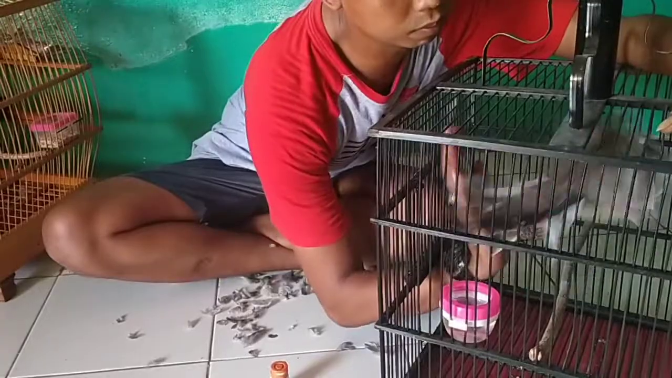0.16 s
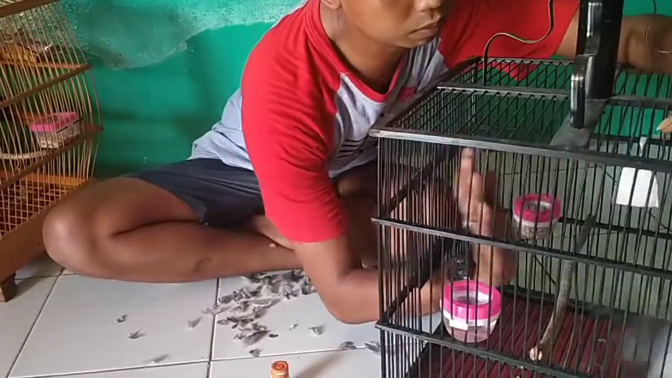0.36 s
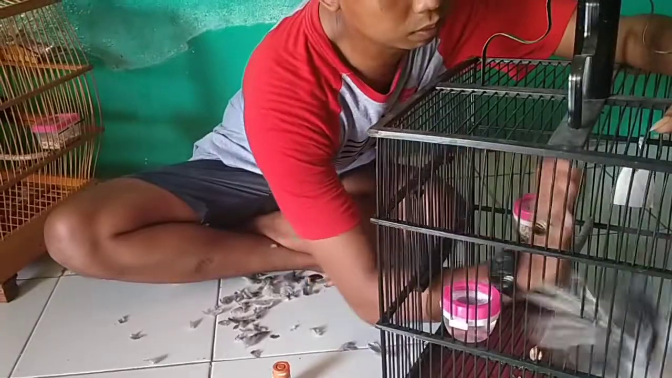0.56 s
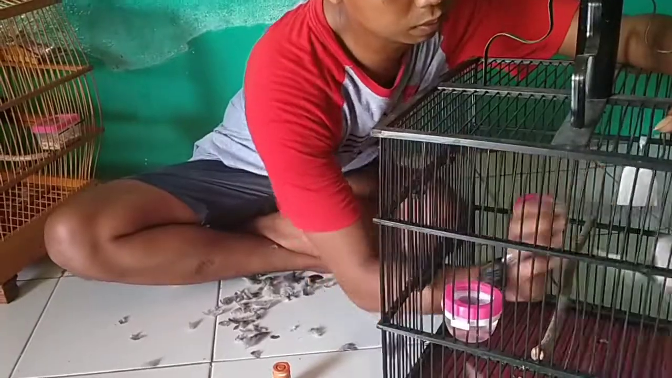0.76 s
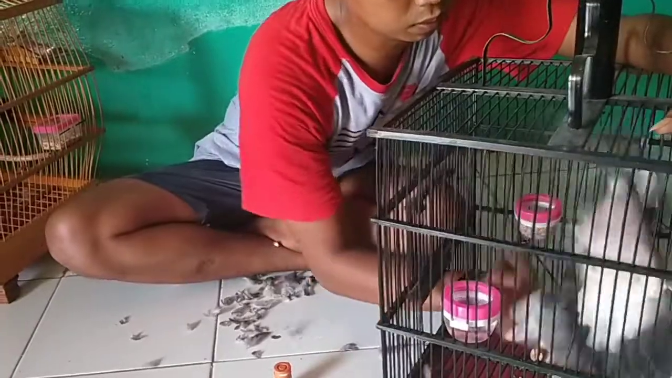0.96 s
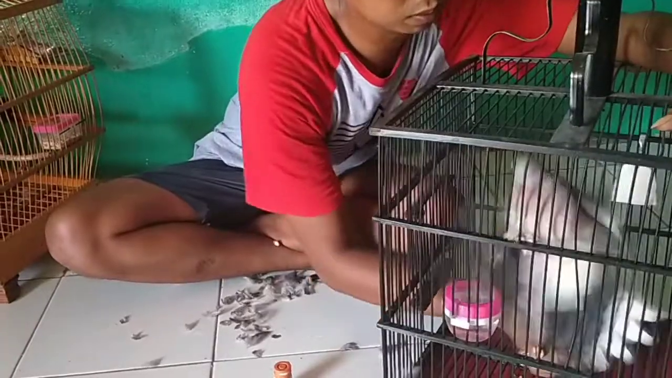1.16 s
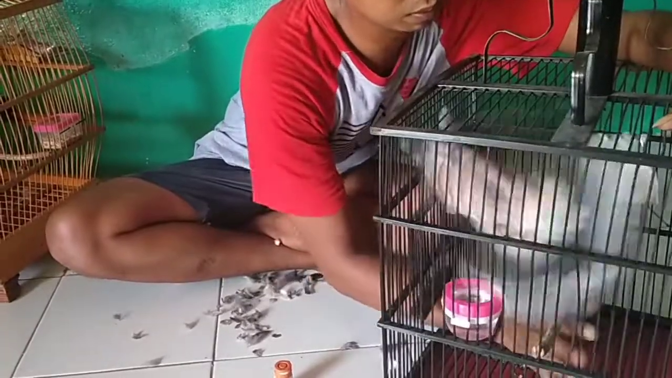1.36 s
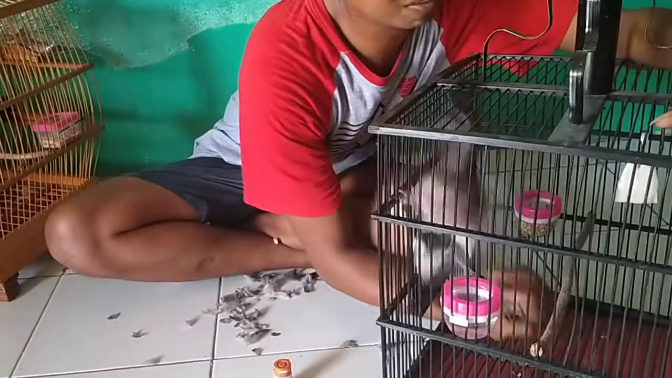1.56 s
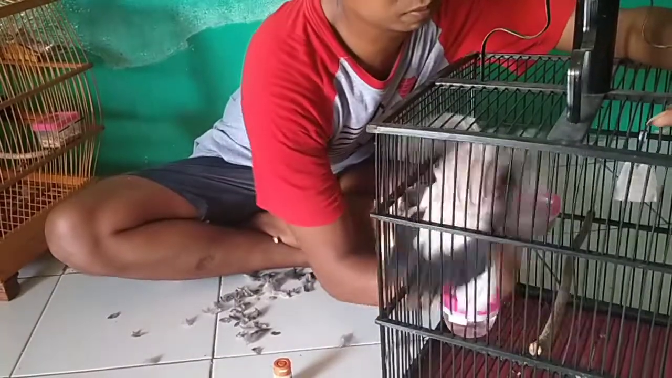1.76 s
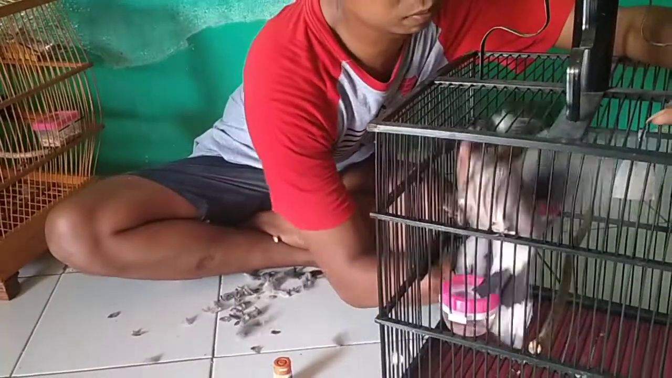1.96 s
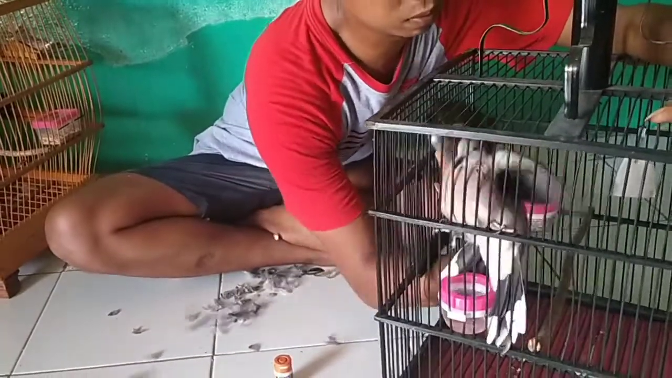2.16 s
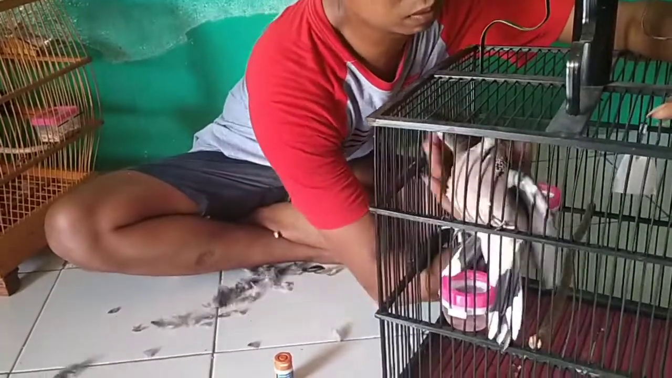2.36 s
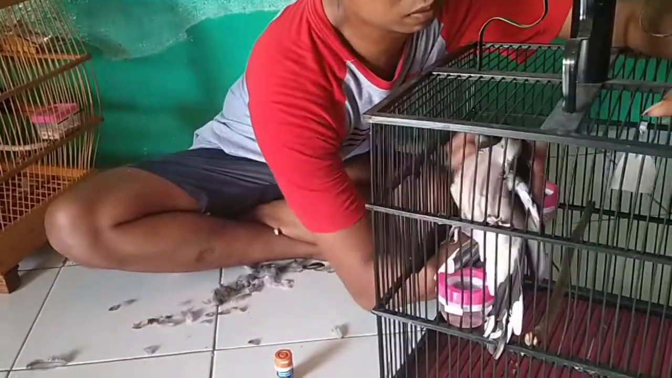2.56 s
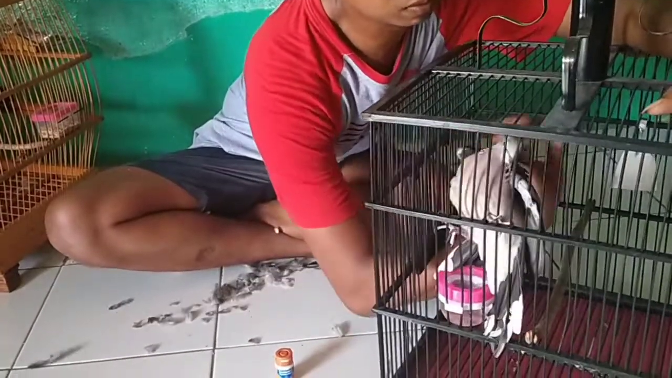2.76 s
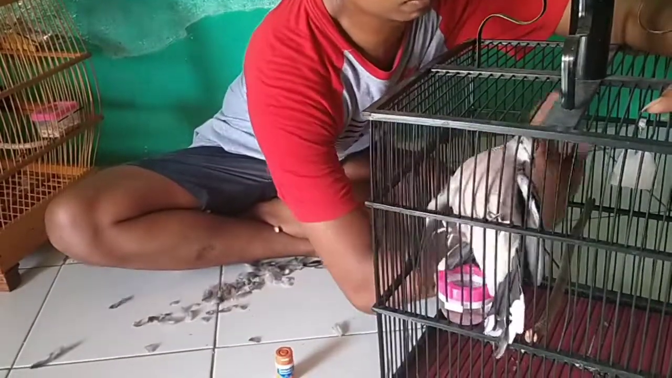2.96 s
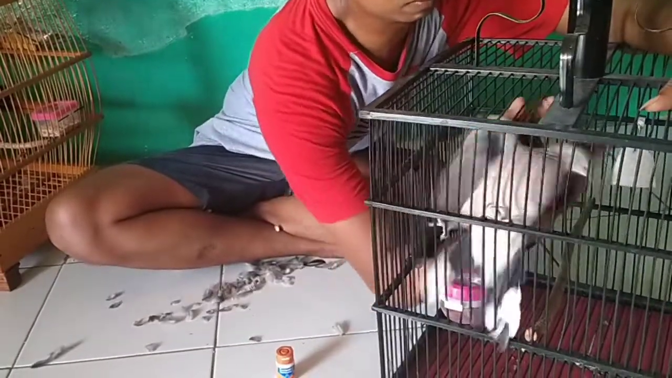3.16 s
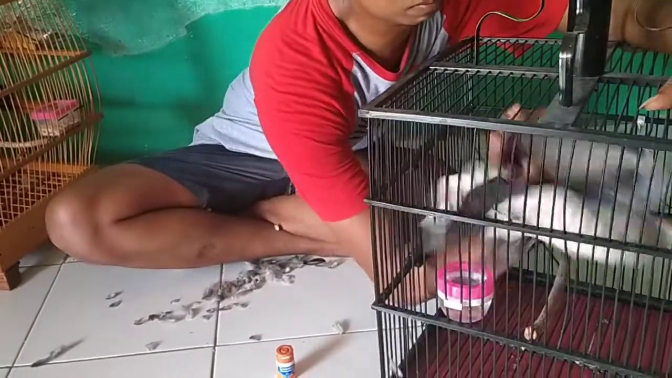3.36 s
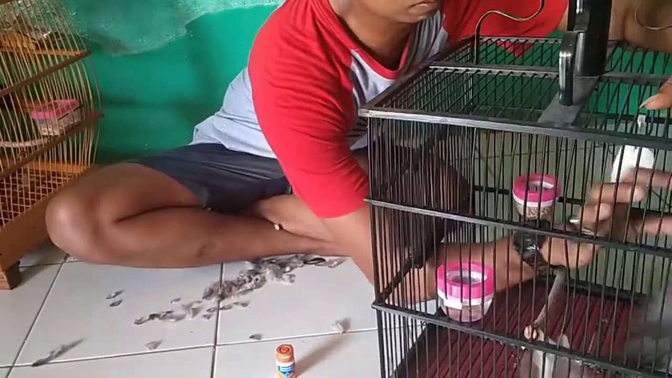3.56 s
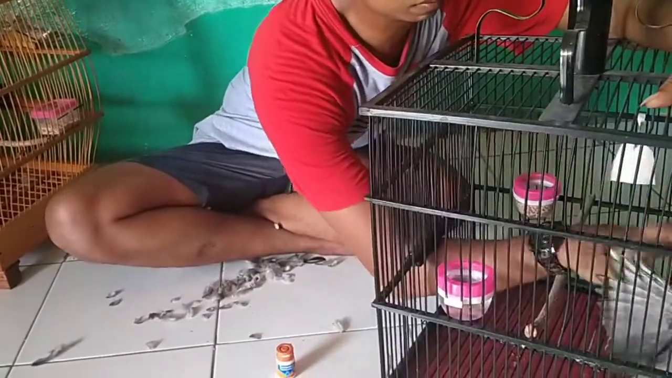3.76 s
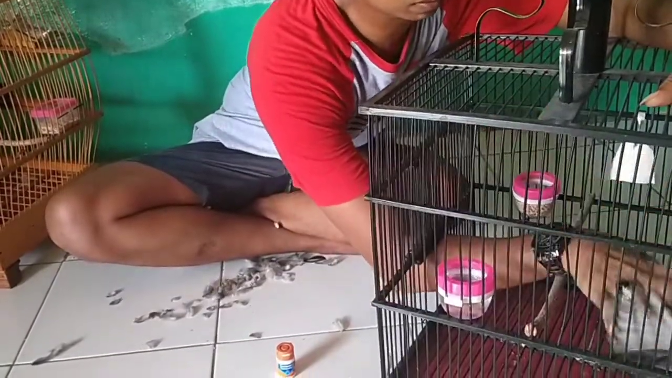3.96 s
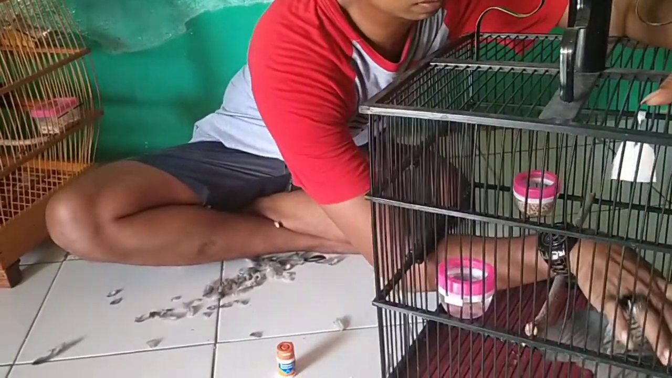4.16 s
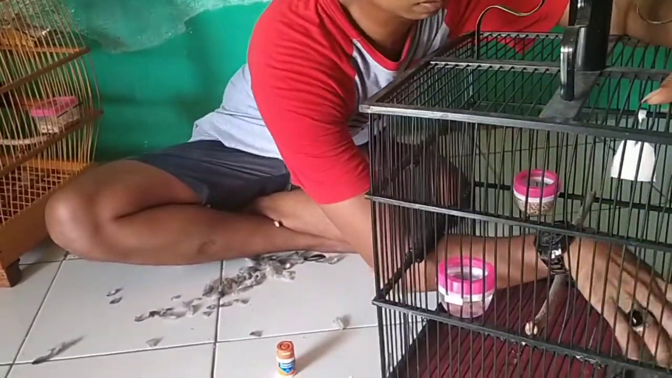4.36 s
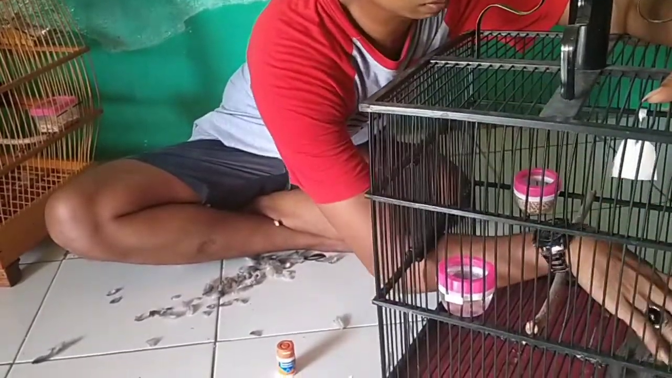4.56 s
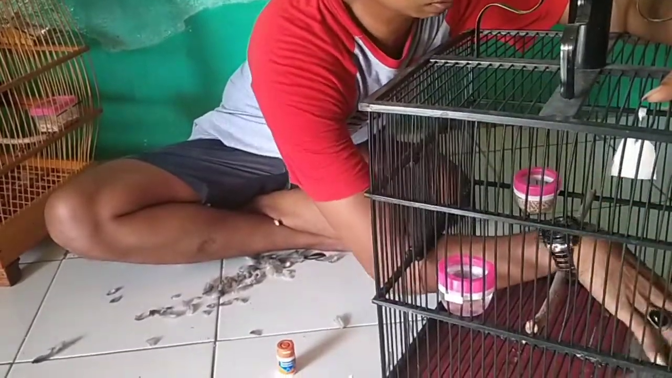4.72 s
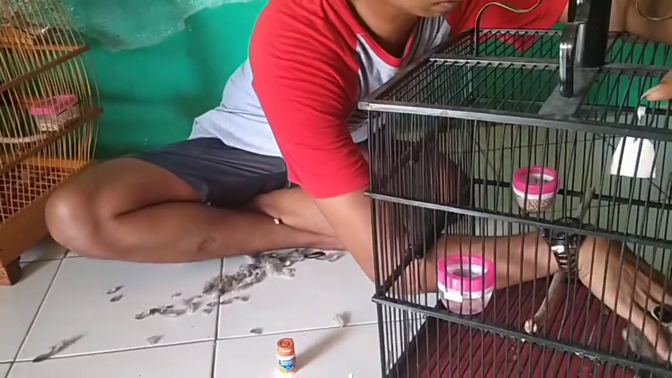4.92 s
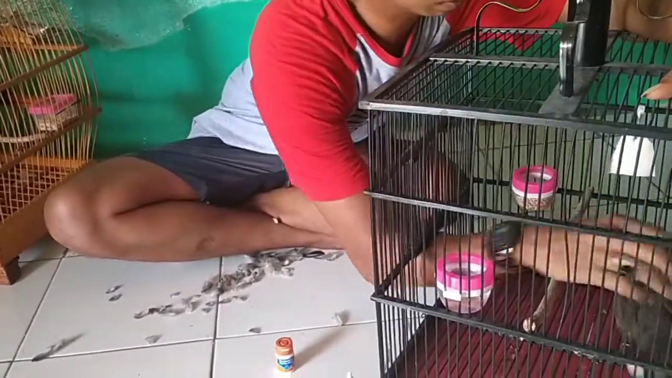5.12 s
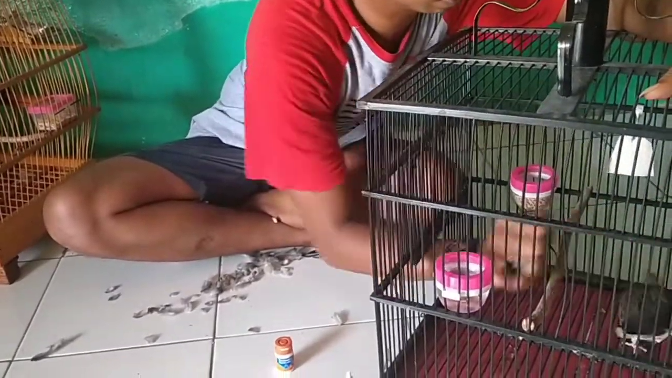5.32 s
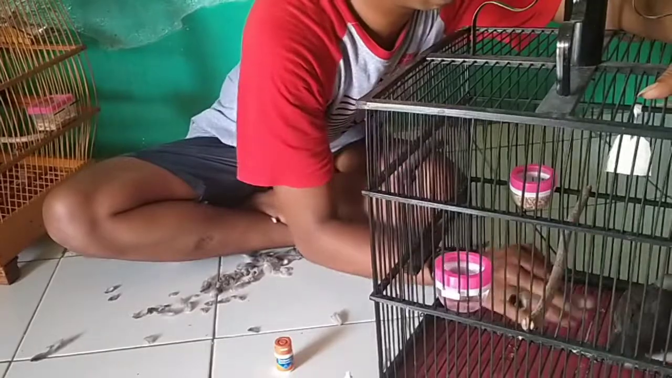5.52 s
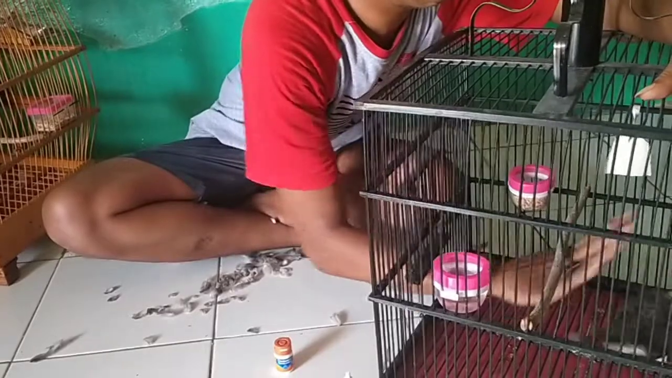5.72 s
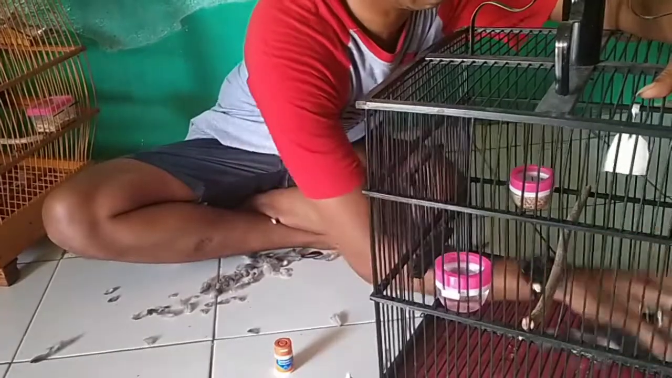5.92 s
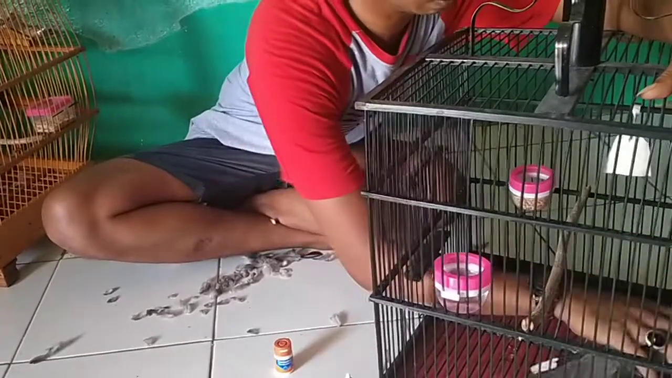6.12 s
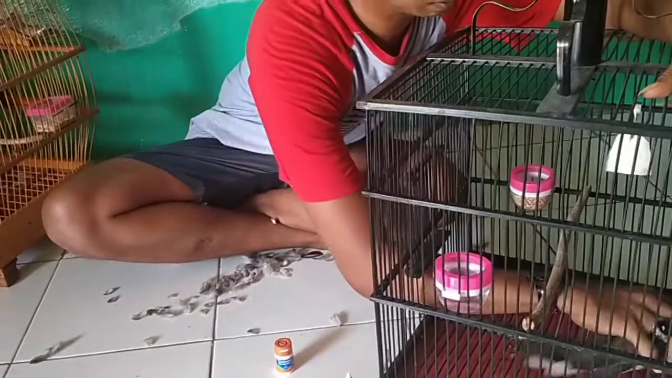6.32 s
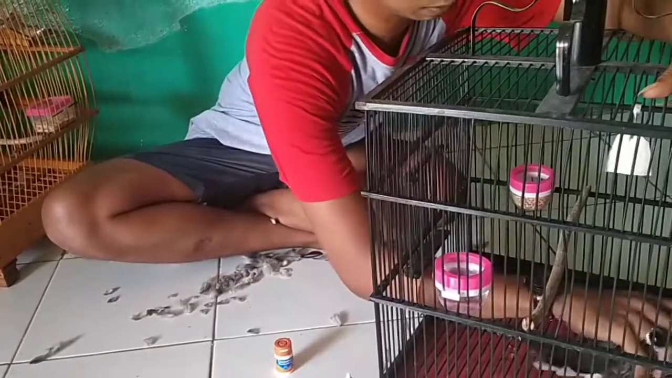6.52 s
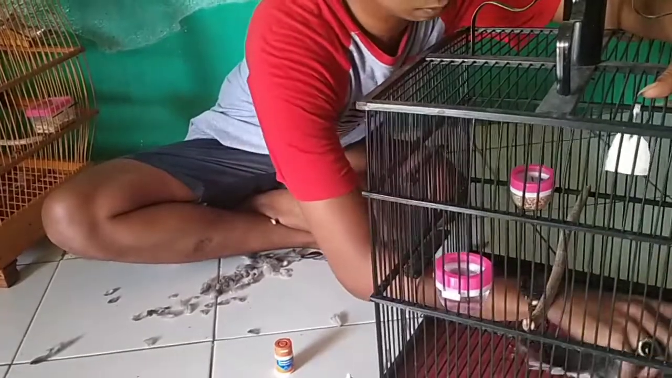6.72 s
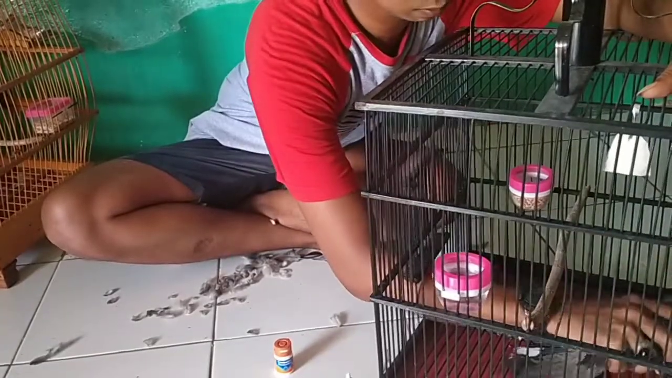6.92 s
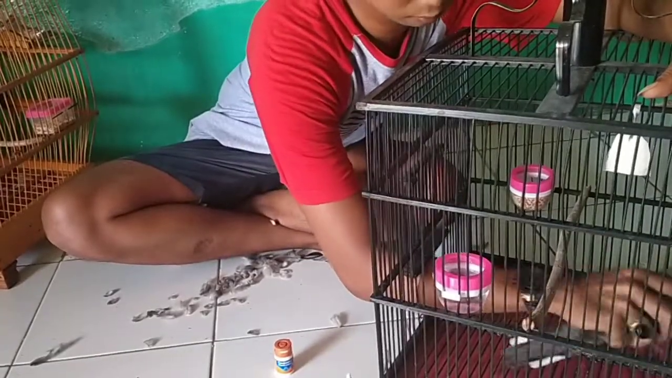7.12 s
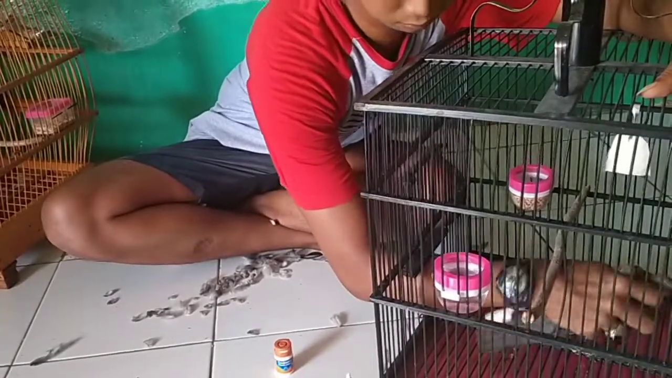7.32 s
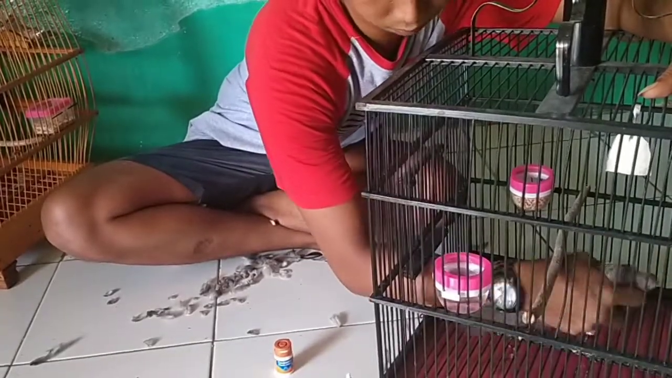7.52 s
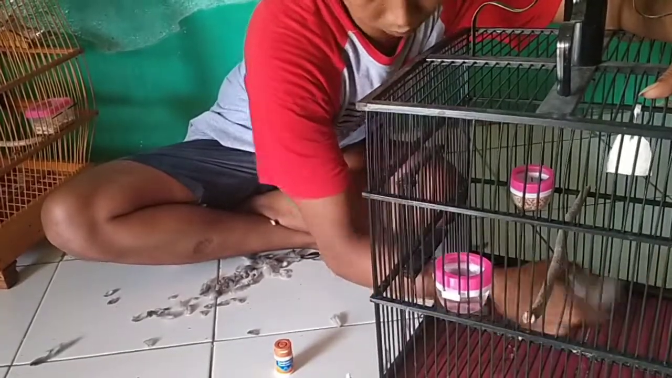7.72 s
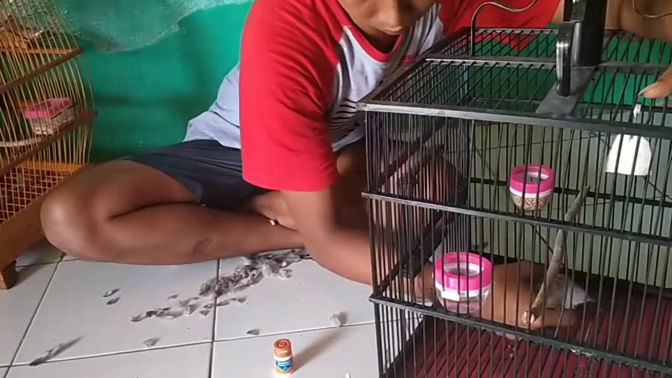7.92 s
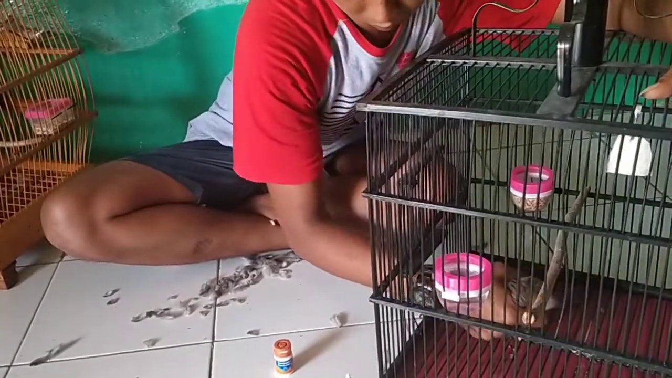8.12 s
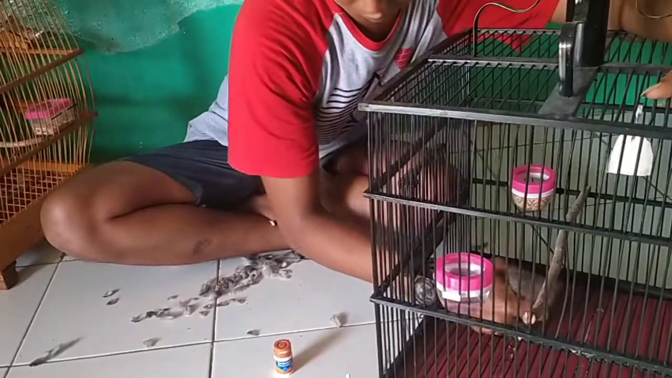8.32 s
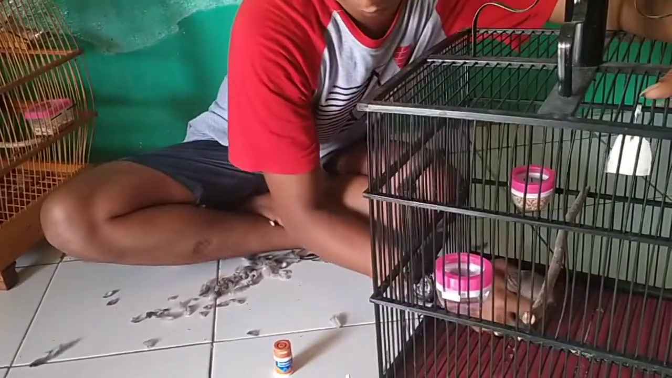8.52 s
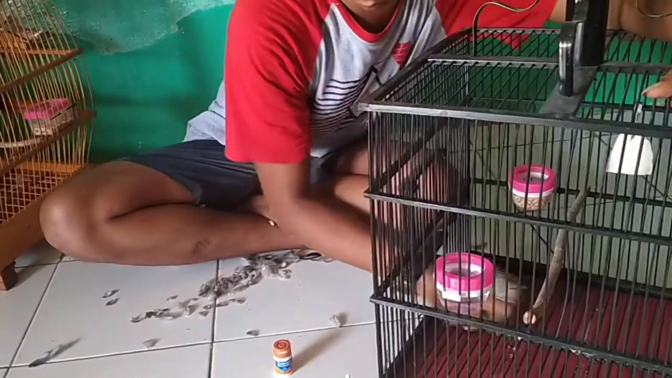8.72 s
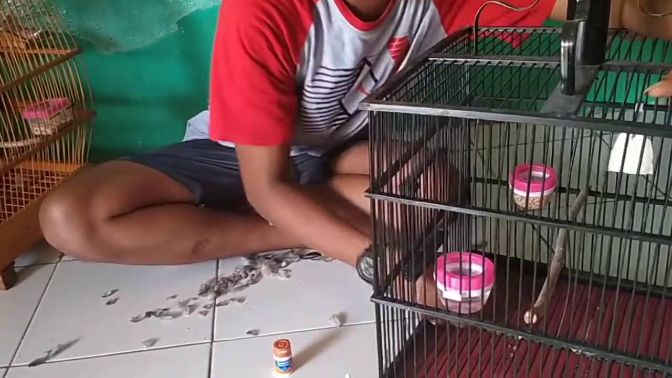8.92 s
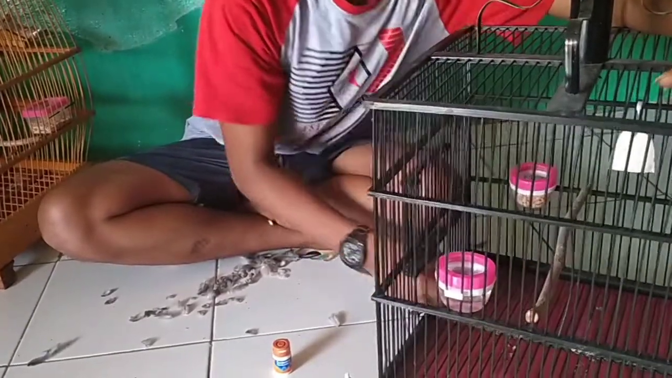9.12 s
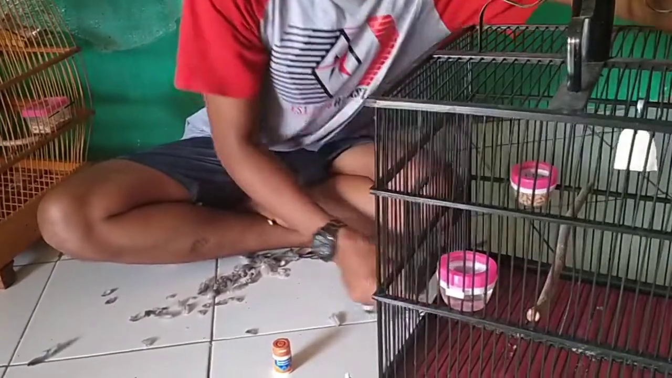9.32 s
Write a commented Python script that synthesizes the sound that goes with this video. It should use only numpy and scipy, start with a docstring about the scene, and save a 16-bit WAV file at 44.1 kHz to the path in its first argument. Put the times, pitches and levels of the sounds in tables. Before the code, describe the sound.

For the first two seconds a dove beats its wings hard against a wire cage, close to the microphone. Feathers drag over the wires in a dense, bright rustle, wing slaps ring the bars, and the tray and frame thud. It eases to light ticks, then a shorter flurry comes at about 3.3 to 3.7 seconds. After that the dove only shuffles, with scattered claw ticks, soft scuffs and small knocks, a little stronger around 7.1 and 8.2 seconds. Further off, another bird whistles faint rising notes, some hoarse, near 4, 5.2, 6, 6.8 and 8.9 seconds, and gives three quick squeaks around 7.7 seconds. A loud, sharp strike on the bars comes at about 9.5 seconds. The cage sounds are strong in the treble, with a slight tiled room echo, quiet air and a low rumble underneath.

```python
"""A tiled room: a dove beats its wings against a wire cage, then shuffles on the tray under a hand.
Feathers drag over the wires as dense clicks; wing slaps and claw ticks ring the bars; tray and frame thud.
Further off, another bird whistles rising notes and squeaks. Room air and a low rumble lie underneath.
The microphone is close and has a strong treble resonance."""
import sys
import numpy as np
from scipy import signal
from scipy.fft import rfft, irfft
from scipy.io import wavfile

SR = 44100
rng = np.random.default_rng(int(sys.argv[2]) if len(sys.argv) > 2 else 0)


def put_to_file(sound):
    """Save the sound as 16-bit audio at rate SR, in the file named by the first command-line argument."""
    columns = np.atleast_2d(sound).T  # one column per channel
    safe = np.clip(columns, -1, 1)
    whole_steps = np.round(safe * 32767)
    wavfile.write(sys.argv[1], SR, whole_steps.astype(np.int16))


N = 418068

# feathers and claws on wire, with the microphone's treble peak: freq_hz, density_db
TREBLE_SPECTRUM = [(1470, -44), (2500, -63.5), (3050, -37.5), (4200, -25.5), (7540, -1), (7910, -0.5),
                   (8440, 3.5), (8670, -25), (9000, -85.5), (11700, -100), (19800, -120)]
# modes of tray and frame: freq_hz, gain_db, t60_s
CAGE_MODES = [(143.6, 4, 0.26), (238.5, -1, 0.17), (293, -7.5, .12), (355, -13.5, 0.2), (416.5, -13, 0.1),
              (460, -10.5, .15), (523, -11.5, 0.11), (552, -12.5, 0.27), (599.5, -1.5, 0.22),
              (685, -13, 0.27), (906, -12.5, 0.16), (962, -10.5, 0.099), (1260, -9.5, 0.047),
              (1570, -21, 0.034)]


def from_db(db):
    """Level to gain."""
    return 10 ** (np.asarray(db) / 20)


def unit_rms(x):
    """Scale to unit power."""
    return x / np.sqrt(np.mean(x ** 2) + 1e-20)


def curves(rows):
    """Breakpoints (time_s, values...) to one per-sample curve a column."""
    time_s, *columns = np.transpose(rows)
    return [np.interp(np.arange(N) / SR, time_s, column) for column in columns]


def drift(rate_hz):
    """Low-passed noise, rms 1."""
    pole = np.exp(-2 * np.pi * rate_hz / SR)
    return unit_rms(signal.lfilter([1], [1, -2 * pole, pole * pole], rng.standard_normal(N + SR))[SR:])


def colour(x, spectrum, size=8192):
    """Minimum-phase filter from (freq_hz, density_db) rows; white noise keeps its power."""
    hz, db = np.transpose(spectrum)
    bin_hz = np.arange(size // 2 + 1) * SR / size
    log_gain = np.log(from_db(np.interp(np.log(bin_hz + 1), np.log(hz), db)))
    cepstrum = irfft(log_gain)
    cepstrum[1:size // 2] *= 2
    cepstrum[size // 2 + 1:] = 0
    response = irfft(np.exp(rfft(cepstrum)))
    return signal.fftconvolve(x, response / np.sqrt(np.sum(response ** 2)))[:N]


def resonance(x, hz, width_hz):
    """Two-pole band-pass, peak gain 1."""
    r = np.exp(-np.pi * width_hz / SR)
    feedback = [1, -2 * r * np.cos(2 * np.pi * hz / SR), r * r]
    return signal.lfilter(np.array([1, 0, -1]) * (1 - r * r) / 2, feedback, x)


def mode(x, hz, t60_s):
    """Resonance set by decay time."""
    return resonance(x, hz, width_hz=np.log(1000) / np.pi / t60_s)


def clicks(per_s, spread_db):
    """Random impulses, rms 1."""
    sizes = from_db(spread_db * np.minimum(rng.exponential(1, N), 5)) * rng.choice([-1, 1], N)
    return unit_rms(sizes * (rng.random(N) < per_s / SR))


def feather_rustle():
    """Vanes drag over the wires as dense clicks; the same clicks shake the cage."""
    # the dove's struggle: time_s, feather_db, thud_db
    struggle = [(0.0,-33.5,-55), (0.2,-30.5,-44.5), (0.31,-43,-51.5), (0.52,-29,-50), (0.76,-30,-48.5),
                (1.0,-24.5,-44), (1.3,-27.5,-43), (1.4,-36,-55), (1.5,-35.5,-52), (1.66,-25.5,-44),
                (1.82,-33.5,-53.5), (1.95,-29,-48), (2.12,-52,-62.5), (2.33,-62.5,-73), (2.45,-47.5,-67.5),
                (2.9,-56.5,-69), (3.34,-45.5,-63.5), (3.44,-32,-57), (3.62,-36.5,-53.5), (3.72,-54,-67.5),
                (4.14,-46,-64.5), (4.26,-46.5,-63.5), (4.45,-57.5,-71.5), (4.85,-55.5,-67.5),
                (5.02,-61,-67), (5.45,-63,-72.5), (5.84,-51.5,-67.5), (6.15,-61.5,-71), (6.8,-54.5,-69.5),
                (7.08,-53.5,-68.5), (7.29,-59,-67.5), (7.8,-54.5,-72), (8.07,-68.5,-70), (8.32,-55,-68.5),
                (9.2,-61.5,-70.5), (9.48,-50,-70)]
    feather_db, thud_db = curves(struggle)
    effort = np.clip((feather_db + 55) / 25, .25, 1)
    flutter_db = effort * (1.5 * drift(8) + 1.4 * drift(58))   # hard beating is more ragged
    drag = clicks(per_s=5500, spread_db=0)
    feathers = colour(drag * from_db(feather_db + flutter_db), TREBLE_SPECTRUM)
    return feathers + cage_body(drag * from_db(thud_db + 0.85 * flutter_db), ring_db=2)


def cage_body(force, ring_db):
    """Tray and frame add their modes to a dull thud."""
    # cage thud: freq_hz, density_db
    thud_spectrum = [(32, -35.5), (55, -2.5), (179, -7), (237, -3.5), (324, -0.5), (359, 0), (683, -2.5),
                     (902, -3.5), (1040, -6.5), (2040, -15.5), (2890, -25.5), (3500, -23.5), (4550, -51),
                     (7700, -120)]
    ring = sum(from_db(db) * mode(force, hz, t60_s) for hz, db, t60_s in CAGE_MODES)
    return colour(force + from_db(ring_db) * ring, thud_spectrum)


def air_and_rumble():
    """Still room air and a low rumble from outside."""
    # room air: freq_hz, density_db
    air_spectrum = [(47, -24.5), (80, -1.5), (102, 0), (190, -2.5), (296, -5.5), (580, -8.5), (672, -21),
                    (3030, -40.5), (4000, -19.5), (5200, -59), (8800, -120)]
    # rumble: freq_hz, density_db
    rumble_spectrum = [(11, -30.5), (18, 8), (30, -0.5), (52, -3), (70, -13.5), (81, -17.5), (100, -26.5),
                       (130, -51.5), (220, -120)]
    # rumble envelope: time_s, level_db
    rumble_levels = [(0.0, -50), (1.13, -49), (2.48, -56.5), (3.77, -45.5), (3.93, -69), (4.14, -51),
                     (4.28, -51.5), (7.5, -52.5), (9.08, -54.5), (9.48, -53)]
    air = from_db(-68 + 0.17 * drift(3.4)) * colour(rng.standard_normal(N), air_spectrum)
    rumble = colour(rng.standard_normal(N), rumble_spectrum, size=32768)
    return air + from_db(curves(rumble_levels)[0]) * rumble


def wire_hits():
    """Feather or claw strikes a bar: a crack, then smaller contacts dying away; the wires ring."""
    # slaps and ticks: start_s, level_db, t60_s, crack_relative_db, bar_hz, snap_share
    strikes = [(0.0252, -21.5, 0.87, -24, 7580, 0.43), (0.1287, -13.5, 0.11, -39, 7500, 0.16),
               (0.141, -16, 0.26, -25.5, 7390, 0.66), (0.184, -21.5, 0.65, -20.5, 7500, 0.2),
               (0.2353, -7, 0.16, -38, 7620, 0.53), (0.3362, -18, 0.37, -41, 7260, 0.45),
               (0.3969, -7, 0.18, -33, 7490, 0.63), (0.4584, -16.5, 0.38, -28, 7360, 0.54),
               (0.4781, -9.5, 0.53, -30, 7400, 0.56), (0.613, -12.5, 0.21, -30, 7800, 0.48),
               (0.6633, -18, 0.14, -33, 7250, 0.43), (0.7169, -14, 0.3, -22, 7500, 0.5),
               (0.7365, -10.5, 0.34, -20, 7300, 0.45), (0.827, -4.5, 0.39, -27.5, 7530, 0.53),
               (0.9068, -9.5, 0.17, -30, 7370, 0.6), (0.922, -6.5, 0.17, -29, 7810, 0.42),
               (0.9727, -8.5, 0.26, -34, 7500, 0.67), (1.0183, -10, 0.41, -21, 7420, 0.37),
               (1.042, -13, 0.53, -27, 7320, 0.3), (1.0874, -11, 0.26, -19.5, 7190, 0.34),
               (1.1638, -6.5, 0.11, -32, 7540, 0.62), (1.227, -18.5, 0.46, -27, 7500, 0.6),
               (1.2514, -12, 0.53, -29, 7430, 0.45), (1.285, -14.5, 0.52, -21.5, 7500, 0.4),
               (1.3353, -9.5, 0.13, -25, 7700, 1), (1.467, -21, 0.26, -36, 7620, 0.6),
               (1.5294, -8, 0.26, -29, 7800, 0.48), (1.6073, -12.5, 0.41, -26, 7160, 0.38),
               (1.6305, -5.5, 0.35, -25.5, 7600, 0.47), (1.7097, -6.5, 0.27, -27.5, 7540, 0.63),
               (1.8585, -13.5, 0.43, -25, 7270, 0.45), (1.9023, -15, 0.35, -20, 7350, 0.45),
               (1.934, -17, 0.28, -37, 7190, 0.35), (1.9815, -19, 0.22, -22, 7600, 0.42),
               (2.0145, -23, 0.23, -13.5, 7500, 0.54), (2.1174, -30, 0.69, -26.5, 7650, 0.55),
               (2.398, -38.5, 0.7, -19, 7800, 0.3), (2.4466, -31.5, 0.54, -22, 7500, 0.45),
               (2.6352, -38.5, 0.25, -34, 7450, 0.56), (2.712, -40, 0.4, -24, 7400, 0.53),
               (2.806, -34, 0.2, -39, 7700, 0.6), (3.012, -36, 0.81, -22, 7430, 0.45),
               (3.141, -29.5, 0.47, -27, 7830, 0.45), (3.2278, -24.5, 0.16, -34.5, 7200, 0.33),
               (3.3412, -23.5, 0.24, -26.5, 6900, 0.5), (3.385, -28, 0.3, -28.5, 7300, 0.35),
               (3.407, -22.5, 0.56, -26, 6840, 0.42), (3.4451, -20, 0.89, -27.5, 7800, 0.4),
               (3.491, -17.5, 0.3, -30, 7200, 0.63), (3.5736, -22.5, 0.38, -31, 7300, 0.28),
               (3.716, -41, 0.1, -27, 7200, 0.45), (3.8217, -36, 0.67, -58, 7150, 0.4),
               (3.937, -35, 0.67, -31, 7600, 0.62), (3.9634, -40, 0.38, -21, 7360, 0.45),
               (4.128, -35, 0.3, -22, 7500, 0.6), (4.1903, -27, 0.35, -30, 6670, 0.3),
               (4.234, -22.5, 0.19, -25, 7200, 0.45), (4.2594, -36, 0.17, -23, 7330, 0.4),
               (4.5296, -28.5, 0.19, -28, 7460, 0.3), (4.5494, -39, 0.17, -18, 7390, 0.7),
               (4.6897, -34.5, 0.52, -22, 7300, 0.45), (4.816, -32.5, 0.23, -31, 6340, 0.3),
               (4.9806, -32.5, 0.23, -29, 7300, 0.45), (5.005, -36.5, 0.21, -27, 7100, 0.5),
               (5.0574, -39, 0.3, -29, 7740, 0.5), (5.0741, -30.5, 0.16, -33, 6470, 0.5),
               (5.1234, -38, 0.2, -17, 7470, 0.3), (5.1996, -28, 0.32, -29, 7460, 0.58),
               (5.3443, -46, 0.3, -27, 5870, 0.45), (5.585, -43, 0.53, -18, 7600, 0.45),
               (5.6565, -39, 0.43, -27, 6850, 0.34), (5.697, -38, 0.32, -21, 7640, 0.6),
               (5.957, -41.5, 0.48, -17, 7360, 0.24), (6.023, -33, 0.17, -26, 7400, 0.6),
               (6.0494, -34, 0.15, -29, 5970, 0.34), (6.322, -41.5, 0.49, -29, 6900, 0.4),
               (6.418, -25, 0.24, -32, 7770, 0.15), (6.4665, -30.5, 0.25, -23, 7550, 0.45),
               (6.4993, -36, 0.21, -25, 7400, 0.33), (6.7623, -26, 0.56, -28, 6940, 0.52),
               (6.7816, -37.5, 0.48, -27, 7660, 0.5), (6.9507, -33, 0.26, -25, 6500, 0.5),
               (7.078, -36.5, 0.66, -29, 7330, 0.45), (7.1164, -26, 0.32, -23.5, 6600, 0.45),
               (7.1484, -23, 0.14, -23.5, 8000, 0.54), (7.239, -41, 0.3, -30, 7740, 0.45),
               (7.3472, -52, 0.3, -23, 7660, 0.6), (7.9428, -48, 0.42, -27, 7280, 0.4),
               (7.9798, -45, 0.32, -20, 7340, 0.5), (8.0401, -39, 0.27, -27, 7340, 0.5),
               (8.0594, -37, 0.19, -27, 7500, 0.45), (8.2288, -21.5, 0.2, -24, 6990, 0.5),
               (8.2407, -28, 0.2, -32, 7400, 0.2), (8.3834, -36.5, 0.35, -30, 7250, 0.5),
               (8.3934, -28.5, 0.31, -29, 7700, 0.4), (8.406, -28.5, 0.22, -30.5, 6000, 0.36),
               (8.534, -45, 0.34, -7, 7460, 0.7), (8.6767, -46, 0.51, -20, 7400, 0.4),
               (8.856, -36.5, 0.22, -26, 6950, 0.6), (8.887, -37, 0.42, -15, 7110, 0.52),
               (8.9291, -43, 0.49, -13, 7600, 0.45), (8.998, -35, 0.28, -7, 7600, 0.38),
               (9.206, -44, 0.46, -23, 7600, 0.4), (9.258, -33, 0.32, -15.5, 7250, 0.28),
               (9.3741, -52, 0.26, -16, 7660, 0.7), (9.4524, -5.5, 0.42, -34, 7150, 0.6)]
    # wire resonances: freq_hz, width_hz, gain_db
    wire_modes = [(5760, 110, -3.5), (6226, 58, -3.5)]
    treble, crack = np.zeros((2, N + SR))
    t = np.arange(SR // 2) / SR
    scatter = clicks(per_s=6000, spread_db=2.5)
    for start_s, level_db, t60_s, crack_db, bar_hz, snap_share in strikes:
        at = round(start_s * SR)
        contacts = np.resize(scatter[at:], len(t))
        snap = 5.4 * (t == 0) + np.exp(-t / 0.0015) * contacts   # first touch, then splintering
        tail = np.minimum(t / 0.0014, 1) * from_db(-60 * t / t60_s) * contacts
        burst = from_db(level_db - 2.5) * (snap_share * snap + 0.48 * (1 - snap_share) * tail)
        sheen = 1.08 * resonance(burst, bar_hz, width_hz=680)
        bar_ring = 1.5 * resonance(burst, bar_hz, width_hz=22)
        treble[at:at + len(t)] += burst + sheen + bar_ring
        crack[at:at + len(t)] += from_db(level_db + crack_db) * (snap + 0.37 * tail)
    wire_ring = sum(from_db(db) * resonance(treble, hz, width_hz) for hz, width_hz, db in wire_modes)
    mid = signal.sosfilt(signal.butter(2, [900, 4300], "band", fs=SR, output="sos"), crack[:N])
    mid -= 1.2 * resonance(mid, 2850, width_hz=5000)   # the microphone is weak near 3 kHz
    return colour(treble + wire_ring, TREBLE_SPECTRUM) + 2.02 * mid


def tray_knocks():
    """A soft push shakes the cage; modes near the struck part's pitch ring on."""
    # knocks on tray and frame: start_s, level_db, t60_s, pitch_hz, ring_relative_db
    knocks = [(0.074, -34, 0.14, 374, 27), (0.108, -28.5, 0.29, 579, 31), (0.235, -23, 0.12, 366, 28.5),
              (0.327, -39.5, 0.31, 242, 24), (0.39, -27, 0.17, 433, 29), (0.477, -40.5, 0.14, 234, 26),
              (0.549, -32, 0.31, 996, 28.5), (0.708, -38, 0.26, 285, 25), (0.732, -27, 0.21, 904, 28.5),
              (0.828, -25.5, 0.24, 417, 20), (0.893, -26.5, 0.19, 635, 30), (0.921, -22.5, 0.13, 907, 30.5),
              (0.973, -31, 0.15, 436, 28), (1.016, -28, 0.11, 366, 26), (1.081, -26.5, 0.26, 423, 25),
              (1.159, -23.5, 0.15, 355, 22), (1.251, -24.5, 0.47, 253, 18), (1.333, -28.5, 0.095, 552, 28),
              (1.436, -35, 0.17, 240, 27), (1.463, -34.5, 0.12, 291, 15.5), (1.529, -25, 0.24, 458, 18),
              (1.627, -24, 0.3, 253, 24), (1.706, -32.5, 0.38, 544, 27.5), (1.848, -41, 0.25, 285, 26),
              (1.917, -26, 0.35, 417, 16), (2.014, -26, 0.12, 568, 20), (2.399, -47.5, 0.19, 541, 22),
              (3.34, -56, 0.13, 447, 28), (3.404, -40, 0.33, 231, 26), (3.49, -33.5, 0.24, 694, 22),
              (3.568, -42, 0.47, 444, 26), (4.267, -46, 0.18, 627, 32), (4.991, -49, 0.26, 606, 31.5),
              (5.125, -47, 0.28, 616, 33), (6.431, -49, 0.33, 563, 21), (6.465, -51, 0.2, 563, 21),
              (6.777, -44.5, 0.35, 406, 25.5), (6.833, -53.5, 0.15, 565, 33), (6.951, -51, 0.46, 598, 18),
              (7.142, -48, 0.25, 603, 36), (7.944, -55.5, 0.3, 509, 35), (8.224, -46, 0.16, 501, 25),
              (8.245, -44, 0.15, 538, 31.5), (8.341, -45, 0.59, 487, 18), (8.517, -55, 0.15, 525, 14),
              (8.995, -38.5, 0.34, 466, 31), (9.258, -54, 0.24, 1640, 32), (9.455, -33.5, 0.12, 546, 33.5)]
    heavy_db, reach_oct = -38, 0.1
    thud, ring = np.zeros((2, N + SR))
    t = np.arange(SR // 2) / SR
    shake = clicks(per_s=2800, spread_db=4)
    bass_cut = signal.butter(2, 330, "high", fs=SR, output="sos")
    for start_s, level_db, t60_s, pitch_hz, ring_db in knocks:
        at = round(start_s * SR)
        first_push = 0.52 * np.exp(-t / 0.0044)
        envelope = np.minimum(t / .0015, 1) * (from_db(-60 * t / t60_s) + first_push)
        burst = from_db(level_db - 12.5) * envelope * np.resize(shake[at:], len(t))
        # light knocks do not move the whole cage: no bass, clearer ring
        thud[at:at + len(t)] += burst if level_db > heavy_db else signal.sosfilt(bass_cut, burst)
        ring_gain = from_db(ring_db + 0.21 * max(-33 - level_db, 0))
        for mode_hz, _, mode_t60_s in CAGE_MODES:
            nearness = np.exp(-(np.log2(mode_hz / pitch_hz) / reach_oct) ** 2)
            ring[at:at + len(t)] += ring_gain * nearness * mode(burst, mode_hz, mode_t60_s)
    return cage_body(thud[:N], ring_db=0) + ring[:N]


def bird_call(start_s, glide_s, hold_s, start_hz, top_hz, partials_db, waver, swell_db):
    """One note: attack, steepening glide with swell, hold, release; overtones grow with loudness."""
    attack_s, release_s = .015, .03
    times_s = start_s + np.cumsum([0, attack_s, .6 * glide_s, .4 * glide_s, hold_s, release_s])
    bend_hz = start_hz + .45 * (top_hz - start_hz)
    pitches_hz = [start_hz, start_hz, bend_hz, top_hz, top_hz, top_hz]
    levels_db = [-28 - swell_db, -swell_db, -swell_db, 0, -6, -35]
    pitch_hz, envelope_db = curves(list(zip(times_s, pitches_hz, levels_db)))
    t = np.arange(N) / SR
    gate = (t > times_s[0]) & (t < times_s[-1])
    phase = 2 * np.pi * np.cumsum(pitch_hz * (1 + waver)) / SR
    partials = (from_db(db + k * envelope_db) * np.sin(k * phase) for k, db in enumerate(partials_db, 1))
    return gate * sum(partials)


def whistles(jitter):
    """The far bird glides up and holds; fast pitch jitter makes some notes hoarse."""
    # rising notes: start_s, glide_s, hold_s, start_hz, top_hz, level_db, octave_relative_db, waver_share
    notes = [(4.048, 0.13, 0.083, 1487, 1970, -54, -29, .06),
             (5.156, 0.13, 0.021, 1874, 2444, -53.5, -18, 0.01),
             (6.043, .16, 0.032, 1820, 2478, -53, -16, .008),
             (6.833, .18, 0.037, 1660, 2468, -55, -9, 0.0074),
             (8.868, 0.089, 0.11, 1388, 1883, -53.5, -11, .09)]
    return sum(bird_call(*contour, [db, db + octave_db], waver_share * jitter, swell_db=11.5)
               for *contour, db, octave_db, waver_share in notes)


def squeaks(jitter):
    """Short flat calls led by the second or third partial."""
    # squeaks: start_s, hold_s, pitch_hz, waver_share, partial1_db, partial2_db, partial3_db
    notes = [(7.665, 0.056, 2290, .04, -68, -62, -42.5), (7.735, 0.025, 2480, .015, -82, -34.5, -70),
             (7.773, 0.018, 2470, .015, -84, -46, -69)]
    return sum(bird_call(start_s - .01, .001, hold_s, hz, hz, levels_db, waver * jitter, swell_db=0)
               for start_s, hold_s, hz, waver, *levels_db in notes)


def tiled_room(x, t60_s=0.36, gap_s=.004):
    """Diffuse echoes off tiles and walls: decaying noise after a short gap."""
    t = np.arange(SR) / SR
    echoes = rng.standard_normal(SR) * from_db(-60 * t / t60_s) * (t > gap_s)
    return signal.fftconvolve(x, echoes / np.sqrt(np.sum(echoes ** 2)))[:N]


def scene():
    """Near dove, mostly dry; far bird, half echo; background. Mono."""
    blows = wire_hits() + tray_knocks()
    jitter = drift(rate_hz=150)
    far_bird = whistles(jitter) + squeaks(jitter)
    echoes = tiled_room(from_db(-13) * blows + from_db(1) * far_bird)
    return (feather_rustle() + blows + 0.98 * far_bird + echoes + air_and_rumble())[None]


def record(dry):
    """Steep low-pass."""
    stop_hz, stop_db = 8900, 70
    return signal.sosfilt(signal.cheby2(14, stop_db, stop_hz, fs=SR, output="sos"), dry)


dry = scene()
out = record(dry)
put_to_file(out)
```